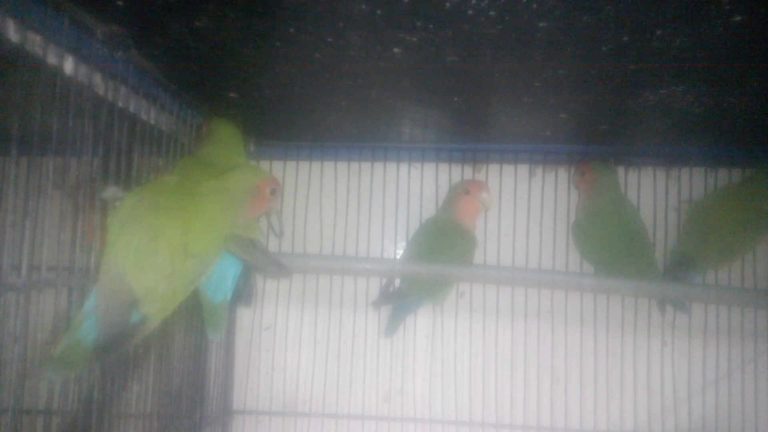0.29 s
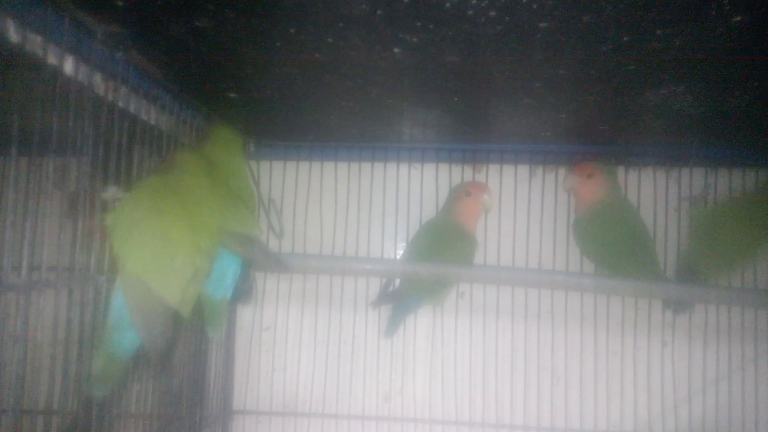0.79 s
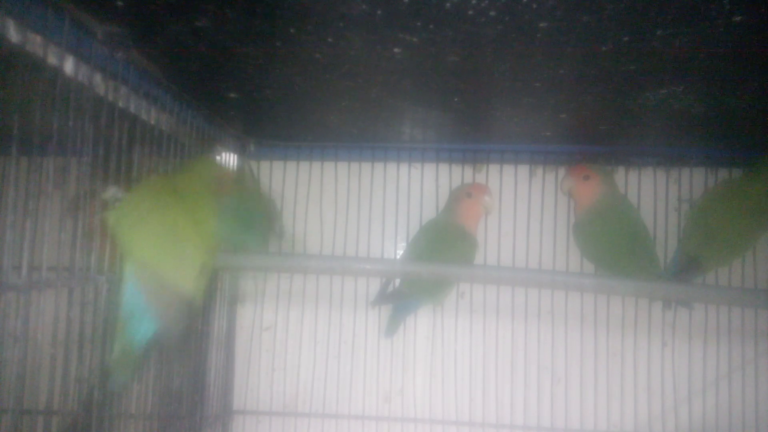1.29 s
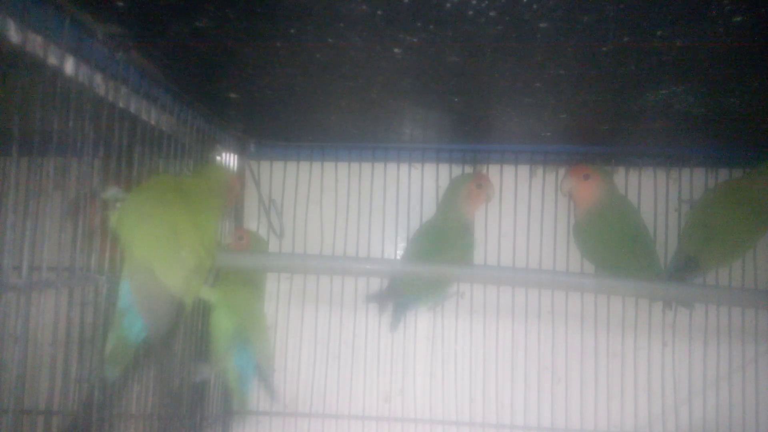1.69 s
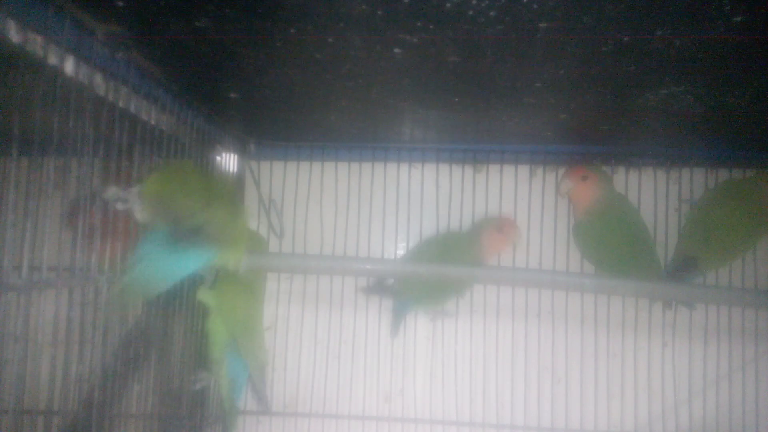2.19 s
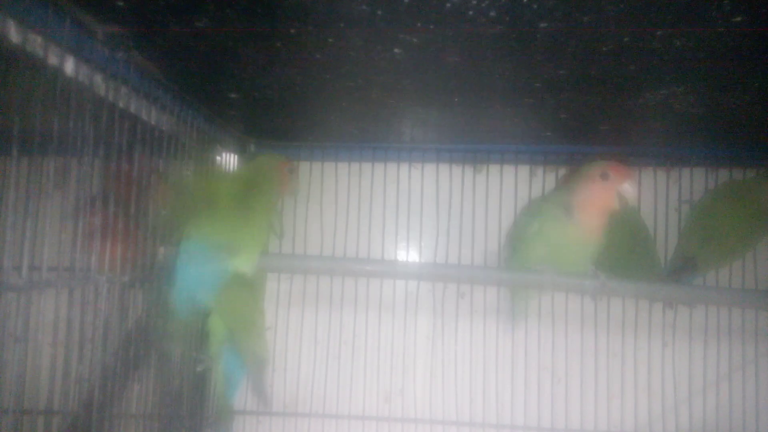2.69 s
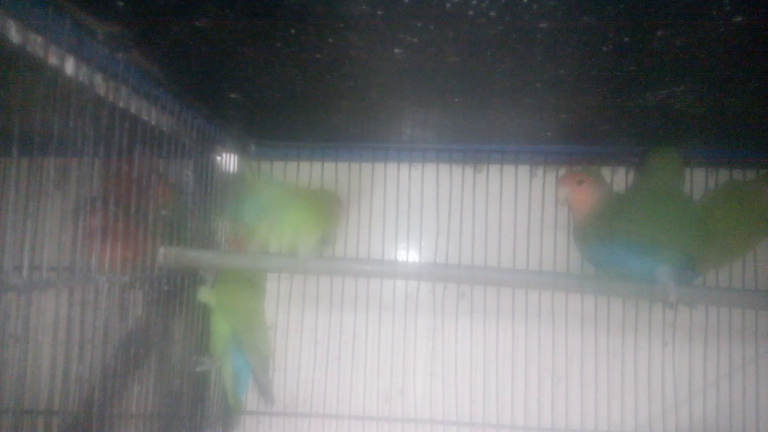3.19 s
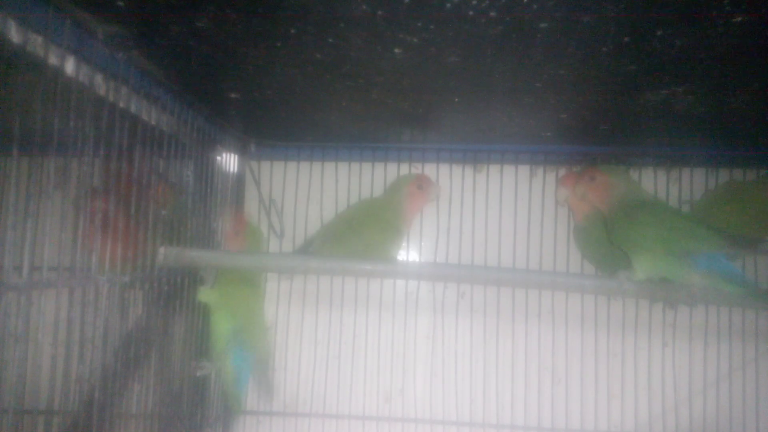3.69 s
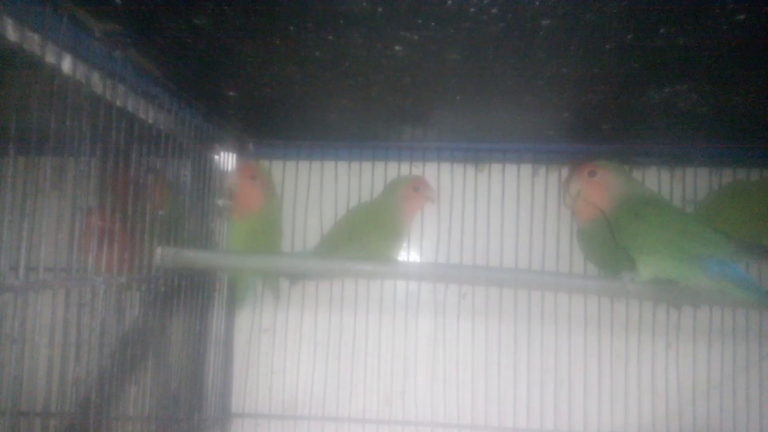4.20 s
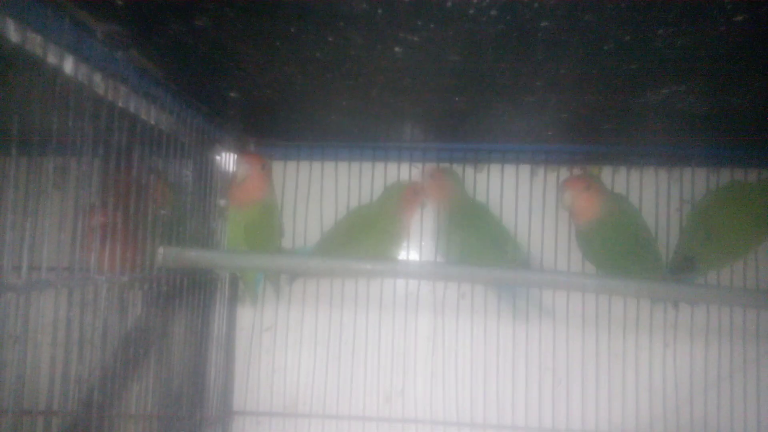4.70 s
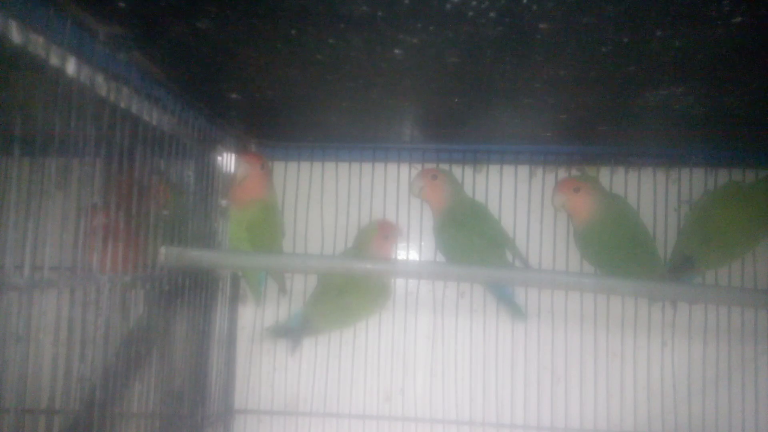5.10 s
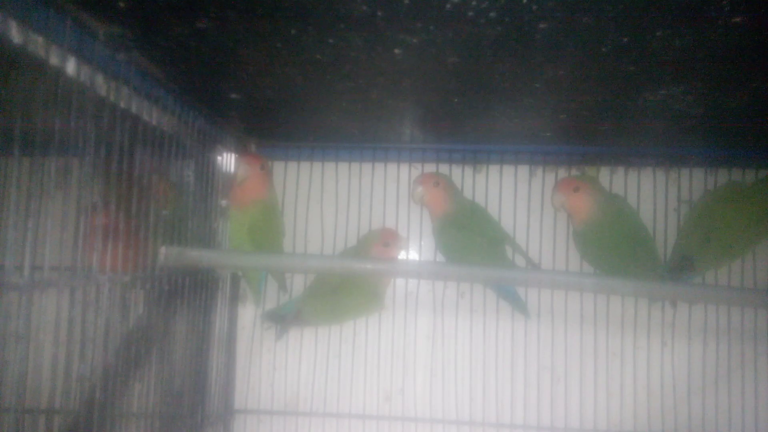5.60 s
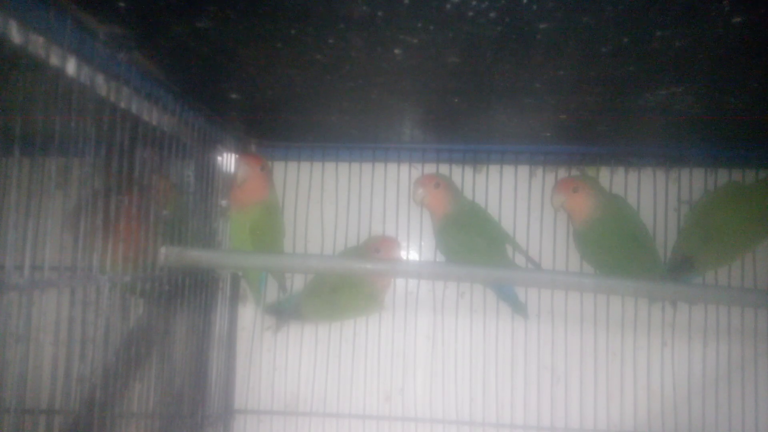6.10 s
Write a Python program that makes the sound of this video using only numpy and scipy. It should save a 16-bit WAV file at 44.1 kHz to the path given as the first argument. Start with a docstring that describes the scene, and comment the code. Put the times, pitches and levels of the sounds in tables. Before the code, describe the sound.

Small parrots screech and chirp close by in a wire cage, over a steady low hum and faint twittering.

```python
"""A hard-walled room: a wavering low hum, a wash of noise, far birds twittering, small taps in a wire cage.
From 1.5 s small parrots close by screech: whistles that rasp, and crack where the pitch jumps.
From 3.4 s they chatter in two bursts of quick chirps while the wash and the far flock swell.
Two last screeches follow. It is all heard through a pocket camera's microphone, dull above 7 kHz,
whose gain control ducks the room under every loud chirp."""
import sys
import numpy as np
from scipy import signal
from scipy.fft import rfft, irfft, next_fast_len
from scipy.io import wavfile
from scipy.ndimage import uniform_filter1d, minimum_filter1d

SR = 44100
rng = np.random.default_rng(int(sys.argv[2]) if len(sys.argv) > 2 else 0)


def waveform_to_disk(signal):
    """Save audio, clipped to [-1, 1], as 16-bit WAV at the path in sys.argv[1]."""
    frames = np.transpose(np.atleast_2d(signal))
    scaled = np.clip(frames, -1, 1) * 32767
    samples = np.round(scaled).astype(np.int16)
    wavfile.write(sys.argv[1], SR, samples)


N = 281358

# Table levels are relative: the mix and the microphone come after them.
# noise bands of the hum and of the drone above it: f/Hz, width/Hz, level/dB
HUM_BANDS = [(67.3, 14, -13), (96, 19, -15.5), (113.4, 22, -2.5)]
DRONE_BANDS = [(154.3, 49, -1), (189.4, 48, -4.5)]
# fader ride of the drone: t/s, level/dB
DRONE_RIDE = [(0.0, -51.5), (2.55, -52.5), (3.2, -40), (3.7, -34.5), (4.1, -41), (4.5, -36), (5.45, -35.5),
              (5.8, -46), (6.38, -40.5)]
# colour of the wash: f/Hz, level/dB
WASH_SPECTRUM = [(15, -47), (25, -38.5), (93, -6), (182, -6.5), (348, -4.5), (731, -8.5), (805, -8.5),
                 (1020, -11.5), (1150, -9), (2730, -14), (4200, -9), (5730, -27.5), (7640, -43),
                 (9930, -89), (16800, -120)]
# fader rides of the background: t/s, wash level/dB, flock level/dB
BACKGROUND_RIDES = [(0.0, -46.5, -47), (.45, -50.5, -66), (.65, -50.5, -46), (1.3, -48.5, -57),
                    (1.75, -50, -36.5), (2.17, -46.5, -57), (2.54, -48.5, -59), (2.8, -48, -36.5),
                    (3.3, -47, -39), (3.6, -32, -18), (4.05, -46, -61.5), (4.42, -35.5, -41),
                    (4.6, -42, -43), (4.9, -40, -27), (5.28, -36, -31.5), (5.55, -43.5, -61),
                    (5.8, -45, -44.5), (6.13, -46, -47.5), (6.38, -41.5, -57)]
# slaps off the cage and near walls: delay/s, level/dB
REFLECTIONS = [(.0021, -10.5), (.0047, -11), (.0078, -19), (.0115, -41.5), (.017, -28.5)]
# decay of the room: f/Hz, T60/s
ROOM_DECAY = [(800, 0.59), (3000, 0.27), (5000, 0.35), (8000, 0.23)]
# single notes of far birds: t/s, length/s, start f/Hz, end f/Hz, level/dB, roughness/0-1
FAR_NOTES = [(0.123, 0.018, 4000, 3970, -34, 0.27), (0.132, 0.015, 3000, 3350, -24, 0.2),
             (0.352, 0.069, 4010, 3850, -35, 0.53), (0.465, 0.054, 3400, 3190, -38.5, 0.82),
             (0.651, 0.023, 3670, 3550, -32, 0.47), (0.728, 0.0087, 3550, 3570, -31, 0),
             (0.806, 0.047, 3940, 4040, -34.5, 0.07), (0.931, 0.061, 3650, 3840, -38, 0.3),
             (1.13, 0.023, 815, 808, -34.5, 0), (1.15, 0.021, 3500, 3470, -35.5, 0.16),
             (1.3, 0.021, 795, 795, -40, 0.3), (1.396, 0.015, 5030, 5160, -33.5, 0.1),
             (1.406, 0.041, 3360, 3084, -36, 0.7), (1.7, 0.043, 2720, 2760, -37.5, 0.36),
             (1.759, 0.028, 4597, 4560, -29, 0), (1.788, 0.041, 3235, 2880, -28, 0.1),
             (1.817, 0.029, 3790, 3720, -25.5, 0.7), (1.895, 0.11, 4070, 3360, -35.5, 0.35),
             (2.052, 0.037, 4270, 4170, -34.5, 0.4), (2.186, 0.029, 5290, 5200, -38, 0.5),
             (2.218, 0.03, 4124, 3950, -32.5, 0.02), (2.418, 0.032, 3910, 3910, -35.5, 0.4),
             (2.535, 0.023, 3250, 3180, -34.5, 0.3), (2.534, 0.019, 4270, 4430, -33, .3),
             (2.9, .05, 2311, 1896, -34.5, .1), (2.916, 0.033, 3640, 3480, -33, .2),
             (5.034, 0.024, 3585, 3520, -20.5, 0.06), (5.354, .03, 3564, 3923, -15, 0.23),
             (5.377, 0.056, 3853, 3130, -23, 0.12), (5.424, 0.029, 3110, 2130, -31, 0.46),
             (5.51, 0.012, 4550, 4520, -30, 0.3), (5.77, 0.042, 940, 970, -40, 0.06),
             (5.818, 0.022, 1896, 2360, -33.5, 0.44), (5.826, 0.085, 3070, 2900, -36, 0.49),
             (5.884, 0.074, 3345, 3286, -33, 0.42), (5.998, 0.04, 3550, 3327, -34, 0.56),
             (6.204, 0.074, 2354, 2088, -42.5, 0.13), (6.262, 0.031, 4380, 3650, -32.5, 0.37)]
# claws and beaks ticking on the wire: t/s, level/dB
WIRE_TICKS = [(1.401, -24.5), (1.473, -31.5), (2.093, -36), (2.207, -28), (2.3, -31), (2.391, -38)]
# ring of the cage wire: f/Hz, level/dB, T60/s
WIRE_MODES = [(7870, -15, 0.062), (9070, -12, 0.029), (11100, -7, 0.12)]
# dull taps on perch and tray: t/s, level/dB, centre f/Hz
PERCH_TAPS = [(0.123, -27.5, 3220), (0.4, -18.5, 2160), (.476, -33.5, 3220), (0.653, -51, 3600),
              (2.092, -37, 4470)]
# parrot screeches, one contour each: t/s, f/Hz, level/dB, half-pitch partial/dB, roughness/0-1
SCREECH_CONTOURS = [
    [(1.537, 3810, -0.5, -22, .8), (1.543, 5450, 9, -7.5, .6), (1.547, 3850, -1, -18, 0),
     (1.56, 4180, 3, -15, 0.4), (1.567, 4940, -1, -10, .3), (1.57, 4170, 3, -17, .25),
     (1.58, 4090, -8.5, -9, 0.3), (1.588, 4980, -1, -9, 0), (1.604, 3854, 0.5, -18, .5),
     (1.608, 4320, -6, -20.5, .9), (1.613, 5150, 2.5, -25, 0.3), (1.62, 5200, -2, -25, .25),
     (1.625, 4680, -5.5, -26, .5), (1.646, 3990, -17, -16, .55)],
    [(2.565, 3960, -32, -11, .15), (2.575, 3770, 6.5, -9, 0.2), (2.578, 5030, 9, -18, 0.2),
     (2.583, 5040, 10, -12, 0.2), (2.588, 4500, 5, -18, 0.1), (2.604, 3960, -1.5, -6, .2),
     (2.608, 4540, -4, -16, .4), (2.618, 4640, 7, -17, 0.3), (2.629, 4070, 8.5, -18.5, .4),
     (2.645, 4340, -11, -9, 0.4), (2.649, 4900, 16, -34, 0), (2.652, 6480, -1, -23, .25),
     (2.661, 6710, -5, -31, 0.1), (2.663, 4590, -2, -45, .2), (2.672, 4954, 8, -45, 0.3),
     (2.681, 4830, -14, -45, 0)],
    [(2.743, 3760, -25, -17, .3), (2.756, 4010, 9, -15, 0.25), (2.759, 5450, 1.5, -6, 0.6),
     (2.769, 4750, -1.5, -18, .45), (2.781, 4390, -2.5, -9.5, 0.3), (2.802, 4900, 3, -20, 0.8),
     (2.814, 4915, 12, -21, .3), (2.817, 4440, -1.5, -9, .2), (2.827, 4990, -4.5, -12, 0),
     (2.829, 3120, 5.5, -33, 0.8), (2.834, 5206, 6.5, -38, .1), (2.869, 4860, -8.5, -34, .07)],
    [(2.96, 3930, -42, -13, 0.1), (2.966, 3790, 2.5, -20, 0), (2.972, 4790, -4, -2, .2),
     (2.998, 5420, -1, -3, .25), (3.004, 4440, 4, -26, 0.65), (3.016, 4375, 9, -28, 0.4),
     (3.018, 3650, -5.5, -33, .5), (3.033, 3894, 5, -38, .7), (3.042, 6005, -7, -39, 0.8),
     (3.05, 6398, -23, -42, .5), (3.052, 5110, -10.5, -42, .2), (3.057, 4920, 7.5, -39, 0.3),
     (3.07, 5150, -7, -34, 0.3)],
    [(3.164, 4520, -34, -14, 0.2), (3.17, 4310, 4, -12, 0.3), (3.172, 5480, 2, -11, 0.4),
     (3.194, 5260, 2, -3, .25), (3.206, 5300, -10, -2.5, 0), (3.209, 4585, -2, -33, 0.9),
     (3.22, 4355, 4, -34, 0.9), (3.227, 3750, -6.5, -29, 0.6), (3.229, 4505, -1, -27, 0.6),
     (3.238, 4250, 2, -24, 0.8), (3.24, 4980, 2, -39, 0.4), (3.246, 5020, 0, -34, 0.2),
     (3.248, 6530, -8.5, -33, 0.56), (3.257, 6370, -9.5, -30, 0.6), (3.26, 4950, -10.5, -32, .2),
     (3.269, 5200, -7, -32, 0.1), (3.277, 4920, -12, -38, .13)],
    [(4.674, 3280, -35.5, -20, 0.4), (4.688, 3300, -10.5, -21, 0.7), (4.694, 3640, -15, 3.5, 0.7),
     (4.702, 3500, -10, -10, .4), (4.704, 4720, 4, -4, 0.1), (4.709, 4570, -5, -24, 0.2),
     (4.728, 4483, 16, -21, 0.25), (4.739, 4310, -7, -11, 0.4), (4.746, 4510, 1.5, -20.5, 0.9),
     (4.765, 4560, -9, -14, 0.6), (4.773, 5040, 26.5, -29, 0.6), (4.781, 5210, -7, -35, .3),
     (4.793, 4815, 9.5, -38, 0.2), (4.804, 4850, -21, -36, .1)],
    [(5.541, 3610, -27, -13, 0), (5.545, 3440, 3, -18, 0.26), (5.553, 3470, -15, -15, 0.6),
     (5.558, 4360, -34, -35, .6), (5.564, 5200, 10, -31, 0.5), (5.567, 5170, 2, -20, 0.4),
     (5.571, 6400, 7, -27, .1), (5.575, 4940, -9, -28, .15), (5.578, 4554, 11.5, -49, .25),
     (5.598, 5133, 7, -45, 0.18), (5.6, 6220, 0, -40, 0.1), (5.621, 6170, -5.5, -40, .05)],
    [(6.332, 3850, -9, -16, 0.2), (6.335, 3630, 3, -23, .3), (6.346, 4490, 1, -25, 0.54),
     (6.358, 4095, -8.5, -10, .14), (6.38, 4094, 6.5, -13.5, 0.06)],
]
# parrot chirps in four parts (buzz, whistle, flip, tail):
# t/s, 4 x length/s, 4 x f/Hz, 4 x level/dB, whistle rise/Hz, mid-whistle level offset/dB
CHIRP_CUES = [(3.364, 0.015, 0.0086, 0.024, .014, 3712, 3820, 6540, 5550, -19, 12, -1, -0.5, 349.5, -6),
              (3.484, 0.012, 0.012, 0.016, .016, 4585, 4150, 6950, 5280, -11, 10.4, 0.5, 8, 147.5, -6),
              (3.605, .012, 0.015, .015, .024, 3613, 3892, 6780, 5293, 5, 10.5, -0.5, 1.5, 348, 3),
              (3.731, .012, .018, 0.011, .024, 3684, 3542, 6170, 4840, 7.5, 14.2, -4, 3.5, 451, -2),
              (3.863, 0.0091, 0.02, 0.013, .023, 3680, 3545, 6160, 4680, -9, 13.4, -5, 4.5, 349.5, -15),
              (4.003, .008, .024, 0.011, .021, 3873, 3452, 6040, 4590, -12, 16.7, -5.5, 1.5, 497.5, -24),
              (4.85, .015, 0.018, .018, .018, 3889, 4116, 6120, 4980, 6, 16.3, 5, 0, 82, 0),
              (4.967, 0.0069, 0.02, 0.02, .012, 4150, 4296, 6190, 5150, 6.5, 12.8, 2.5, -1, -41, 2.5),
              (5.069, 0.013, 0.015, .012, .045, 3920, 4382, 5980, 4713, 5.5, 13, 1, -6, -150, -7),
              (5.187, 0.015, .018, 0.013, .022, 3634, 4366, 5063, 4530, 4, 11.5, 8.5, 6, -150, 1)]
# contour of each part: place in the part/0-1, pitch ratio, level/dB
PART_SHAPES = [
    [(.01, 1.01, -16.5), (.3, .99, 0.5), (.6, 1.03, -5), (.97, 1.17, -13.5)],
    [(.01, 1.001, -16), (.3, 1.001, -3.5), (.6, 1.001, -3), (.8, 1.001, 4), (.9, 1.02, -1.5),
     (.99, 1.1, -2.5)],
    [(.08, .97, 0.5), (.5, 1.01, 3), (.97, .98, -2)],
    [(.03, 1.02, 0.5), (.3, 1.001, 1), (.99, .95, -11)],
]
# timbre of each part: half-pitch partial/dB, roughness/0-1, overtones/dB
PART_TIMBRES = [(-18, .35, -23), (-52.5, .05, -24.5), (-37.5, .2, -22), (-46, .3, -17)]
# microphone response: f/Hz, level/dB
MIC_RESPONSE = [(25, -6), (60, 4.5), (6700, 1), (7300, -16.5), (8000, -17.5), (10000, -22), (12500, -29),
                (15500, -25.5)]

SCREECH_OVERTONES_DB = -15
UPPER_DB, UPPER_PER_HALF = 3.5, 0.91  # partials at 1.5, 2.5 and 3.5 x pitch follow the one at half
BREAK_DB, JUMP_HZ_PER_MS = -11, 700  # the voice cracks and dips when the pitch jumps this fast
THRESHOLD_DB, DUCK_SLOPE, RELEASE_DB_PER_S = -26, 0.55, 500
BASS_HZ, BASS_DUCK = 230, 0.68  # the bass gets only this share of the ducking


def gain_of(db):
    return 10 ** (np.asarray(db) / 20)


def unit_rms(x):
    return x / np.sqrt(np.mean(x ** 2) + 1e-20)


def at_frequency(points, hz):
    f, value = np.transpose(points)
    return np.interp(np.log(hz + 1), np.log(f + 1), value)


def ride(table, column=1):
    """A fader move in dB, sample by sample."""
    rows = np.array(table)
    return np.interp(np.arange(N) / SR, rows[:, 0], rows[:, column])


def add(mix, start, sound):
    part = mix[round(start * SR):][:len(sound)]
    part += sound[:len(part)]


def wobble(n, hz):
    """Smooth noise of rms about 1 that wanders up to the given rate."""
    k = max(int(SR / hz), 1)
    smooth = uniform_filter1d(uniform_filter1d(rng.standard_normal(n + 4 * k), k), k)
    return smooth[2 * k:][:n] * np.sqrt(1.65 * k)


def hum(bands, db):
    """Narrow low bands of noise whose level wavers."""
    hz = np.fft.rfftfreq(N, 1 / SR)
    colour = sum(gain_of(level) / (1 + ((hz - f) / (width / 2)) ** 4) for f, width, level in bands)
    fader = gain_of(db + 1.5 * wobble(N, hz=3))
    return fader * unit_rms(irfft(rfft(rng.standard_normal(N)) * colour, N))


def wash():
    """A bed of broad noise with drifting patches of colour, swelling and fading."""
    frames, hz = N // 256 + 5, np.fft.rfftfreq(1024, 1 / SR)
    real, imag, patches = rng.standard_normal((frames, 513, 3)).T
    patches = unit_rms(uniform_filter1d(uniform_filter1d(patches, 12, 0), 10, 1))
    colour = gain_of(at_frequency(WASH_SPECTRUM, hz)[:, None] + 2.47 * patches)
    noise = signal.istft((real + 1j * imag) * colour, nperseg=1024, noverlap=768)[1]
    return gain_of(ride(BACKGROUND_RIDES) + 8) * unit_rms(noise[:N])


def early_reflections(x):
    """The direct sound plus a few close slaps of alternating polarity."""
    out = x.copy()
    for k, (delay, db) in enumerate(REFLECTIONS):
        add(out, delay, (-1) ** k * gain_of(db) * x)
    return out


def reverb(x, decay_scale=1):
    """Sparse echoes of random polarity, each band dying at its own speed."""
    echoes, slots = np.zeros(SR), np.arange(400, SR - 20, 20)
    echoes[slots + rng.integers(0, 20, len(slots))] = rng.choice([-1., 1.], len(slots))
    hz, t, bands = signal.stft(echoes, SR, nperseg=256)
    t60 = decay_scale * at_frequency(ROOM_DECAY, hz)[:, None]
    ring = signal.istft(bands * gain_of(-60 * t / t60), SR, nperseg=256)[1]
    return signal.fftconvolve(x, ring / np.linalg.norm(ring))[:N]


def syrinx(hz, db, rough, half_db, upper_db, overtones_db):
    """A bird's gliding whistle; in rough stretches a slower vibration chops it into a rasp."""
    n, rough = len(hz), np.clip(rough, 0, 1)
    jitter = (0.0046 + .035 * rough) * wobble(n, 500)
    phase = 2 * np.pi * np.cumsum(hz * (1 + jitter)) / SR
    # membranes that close on alternate cycles add partials at half-steps of the pitch
    half = gain_of(half_db) * np.sin(phase / 2)
    upper = gain_of(upper_db) * (np.sin(1.5 * phase) + .4 * np.sin(2.5 * phase) + .3 * np.sin(3.5 * phase))
    overtones = gain_of(overtones_db) * (np.sin(2 * phase) + 0.78 * np.sin(3 * phase))
    tone = np.sin(phase) + half + upper + overtones
    rasp_hz = 460 * (1 + .3 * wobble(n, 150))
    rasp = np.sin(2 * np.pi * np.cumsum(rasp_hz) / SR)
    flutter = 1 - .5 * rough + rough * (0.98 * rasp + 0.94 * wobble(n, 820)) + 0.17 * wobble(n, 200)
    breath = 0.07 * rough * np.diff(rng.standard_normal(n + 1))
    return gain_of(db) * np.sqrt(2) * (tone * flutter + breath)


def far_note(length, start_hz, end_hz, db, rough, half_db=-60):
    """One short, scratchy whistle with soft ends, its overtones dulled by distance."""
    n = int((length + 0.0014) * SR)
    fades = signal.windows.tukey(n, min(0.0078 * SR / n, 1))
    hz = np.linspace(start_hz, end_hz, n) * (1 + .012 * wobble(n, 250))
    return fades * syrinx(hz, db, rough, half_db, upper_db=-60, overtones_db=-35)


def far_birds():
    """Single clear notes over the scattered twitter of the whole flock."""
    solos, flock = np.zeros(N), np.zeros(N)
    for start, *note in FAR_NOTES:
        add(solos, start, far_note(*note))
    for when, pitch, length, glide, level in rng.random((500, 5)):
        hz = 2600 + 3400 * pitch ** 1.2
        end_hz = hz * (.9 + 0.19 * glide)
        tweet = far_note(0.012 + 0.037 * length, hz, end_hz, db=8 * level, rough=0.4, half_db=-6.5)
        add(flock, when * N / SR, tweet)
    return solos + gain_of(ride(BACKGROUND_RIDES, column=2)) * unit_rms(flock)


def cage_foley():
    """Claws and beaks click on the wire and ring its modes unevenly; perch taps are puffs of noise."""
    out, t = np.zeros(N), np.arange(4000) / SR
    for start, db in WIRE_TICKS:
        click = np.diff(rng.standard_normal(len(t) + 1))
        add(out, start, gain_of(db - 10 - 60 * t / 0.04) * click)
        for hz, mode_db, t60 in WIRE_MODES:
            strike, detune = rng.uniform(-1.1, 1, 2)
            ring = np.sin(2 * np.pi * hz * (1 + .07 * detune) * t)
            add(out, start, gain_of(db + mode_db + 9 * strike - 60 * t / t60) * ring)
    for start, db, hz in PERCH_TAPS:
        band = signal.butter(2, (hz / 1.5, hz * 1.5), "band", fs=SR, output="sos")
        tap = signal.sosfilt(band, rng.standard_normal(len(t)))
        add(out, start, gain_of(db - 60 * t / 0.11) * tap)
    return out


def chirp_contour(start, *cue):
    """Buzz, whistle, flip and tail end to end, as points of time, pitch, level and timbre."""
    lengths, pitches, levels = np.reshape(cue[:-2], (3, 4))
    rise_hz, middle_db = cue[-2:]
    onsets = start + np.cumsum(lengths) - lengths
    parts = []
    for onset, length, hz, db, shape, timbre in zip(onsets, lengths, pitches, levels,
                                                    PART_SHAPES, PART_TIMBRES):
        parts.append(np.array([(onset + place * length, hz * ratio, db + shape_db, *timbre)
                               for place, ratio, shape_db in shape]))
    whistle = parts[1]
    progress = (whistle[:, 0] - whistle[0, 0]) / lengths[1]
    whistle[:, 1] += rise_hz * progress
    whistle[2, 2] += middle_db
    return np.vstack(parts)


def parrots():
    """Each screech or chirp is one continuous whistle that cracks at sudden jumps of pitch."""
    calls = [np.c_[call, np.full(len(call), SCREECH_OVERTONES_DB)] for call in SCREECH_CONTOURS]
    calls += [chirp_contour(*cue) for cue in CHIRP_CUES]
    calls.sort(key=lambda call: call[0, 0])
    t = np.arange(N) / SR
    times, *columns = np.vstack(calls).T
    hz, *controls = (np.interp(t, np.maximum.accumulate(times), column) for column in columns)
    gate = sum((t >= call[0, 0]) & (t < call[-1, 0]) for call in calls) * 1.
    hz = uniform_filter1d(hz, 30)  # the pitch snaps across within a millisecond
    db, half_db, rough, overtones_db = uniform_filter1d(controls, 80, axis=1)
    hz_per_ms = abs(np.gradient(hz)) * SR / 1000
    crack = np.minimum(hz_per_ms / JUMP_HZ_PER_MS, 1) ** 2
    db = db + BREAK_DB * uniform_filter1d(crack, 40)
    voice = syrinx(hz, db, rough, half_db, UPPER_DB + UPPER_PER_HALF * half_db, overtones_db)
    beak = signal.butter(6, 1500, "high", fs=SR, output="sos")  # a small beak radiates no low sound
    return signal.sosfilt(beak, uniform_filter1d(gate, 60) * voice)


def scene():
    """The cage up front and nearly dry, the far birds wetter, hum and wash underneath."""
    near, far = parrots() + cage_foley(), far_birds()
    birds = early_reflections(near + gain_of(-2.5) * far)
    birds += reverb(gain_of(-24) * near + gain_of(-7.5) * far)
    birds += gain_of(-17) * reverb(near, decay_scale=0.29)  # the cage's corner dies away sooner
    bed = hum(HUM_BANDS, db=-44.5) + hum(DRONE_BANDS, ride(DRONE_RIDE)) + wash()
    return (birds + bed)[None]


def record(dry):
    """The camera's chain: dull microphone, quick gain control, peak limiter, clipper, high cut."""
    size = next_fast_len(N + SR // 4)
    response = gain_of(at_frequency(MIC_RESPONSE, np.fft.rfftfreq(size, 1 / SR)))
    x = irfft(rfft(dry[0], size) * response, size)[:N]
    power_db = 10 * np.log10(abs(uniform_filter1d(x ** 2, 150)) + 1e-12)
    release_db = np.arange(N) * RELEASE_DB_PER_S / SR
    held_db = np.maximum.accumulate(power_db + release_db) - release_db
    duck_db = DUCK_SLOPE * uniform_filter1d(np.maximum(held_db - THRESHOLD_DB, 0), 120)
    bass = signal.sosfiltfilt(signal.butter(2, BASS_HZ, fs=SR, output="sos"), x)
    x = (x - bass) / gain_of(duck_db) + bass / gain_of(BASS_DUCK * duck_db)
    limiter_gain = np.minimum(.76 / (abs(x) + 1e-9), 1)
    x = x * uniform_filter1d(minimum_filter1d(limiter_gain, size=41), size=35)
    x = np.clip(x, -.71, .71)  # the very highest peaks still clip and crackle
    high_cut = signal.firwin(511, 15900, window=("kaiser", 9), fs=SR)
    return signal.oaconvolve(x, high_cut, "same")[None]


dry = scene()
out = record(dry)
waveform_to_disk(out)
```